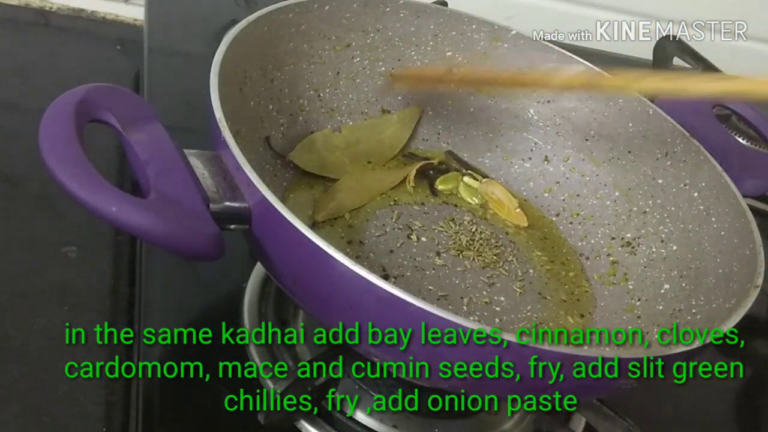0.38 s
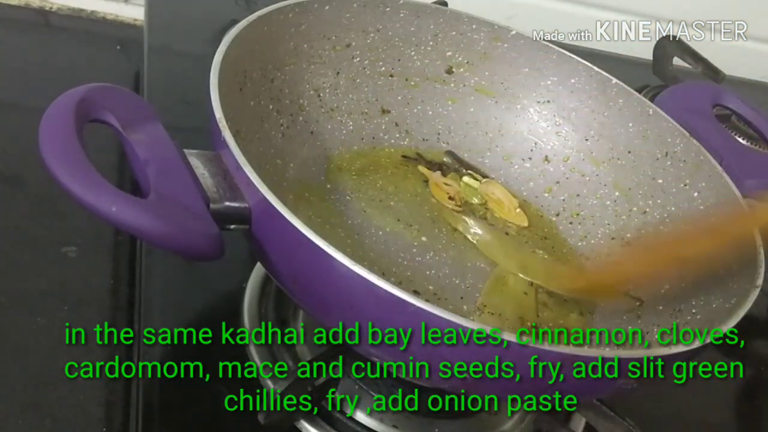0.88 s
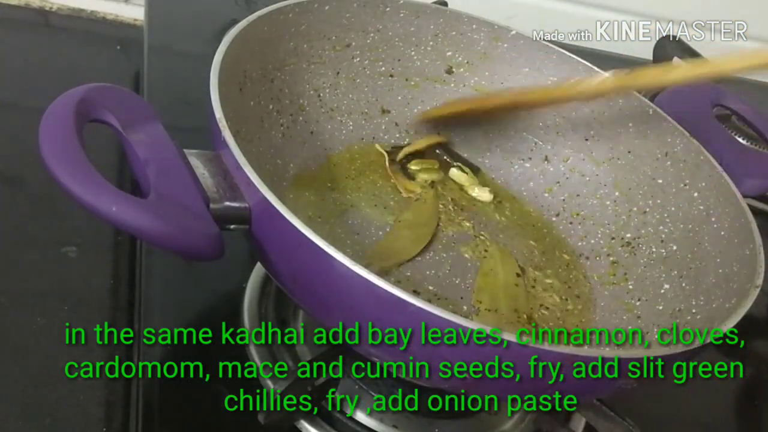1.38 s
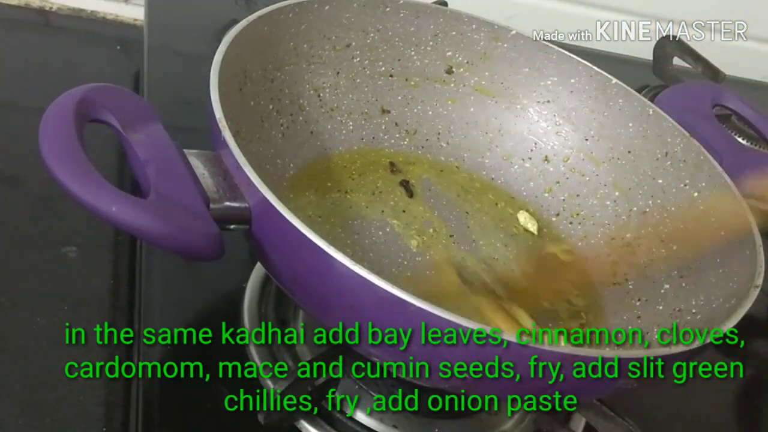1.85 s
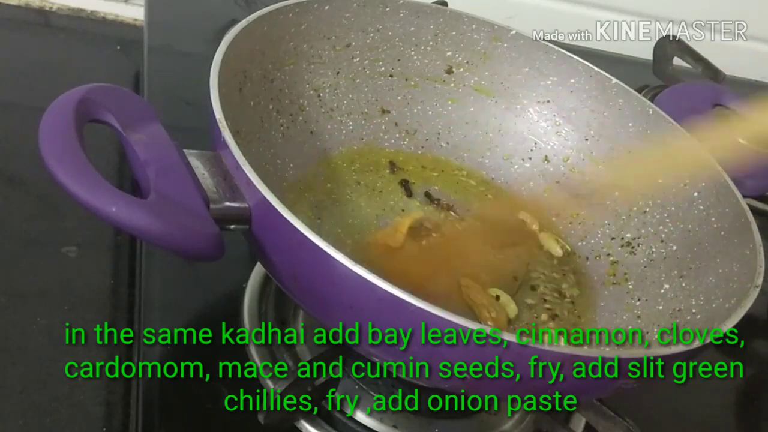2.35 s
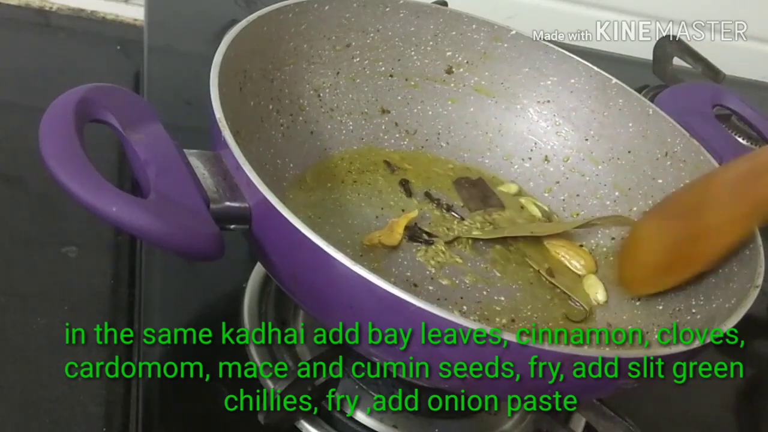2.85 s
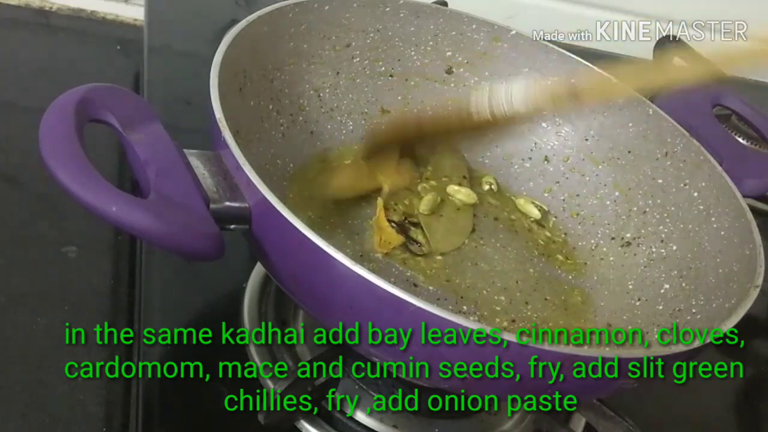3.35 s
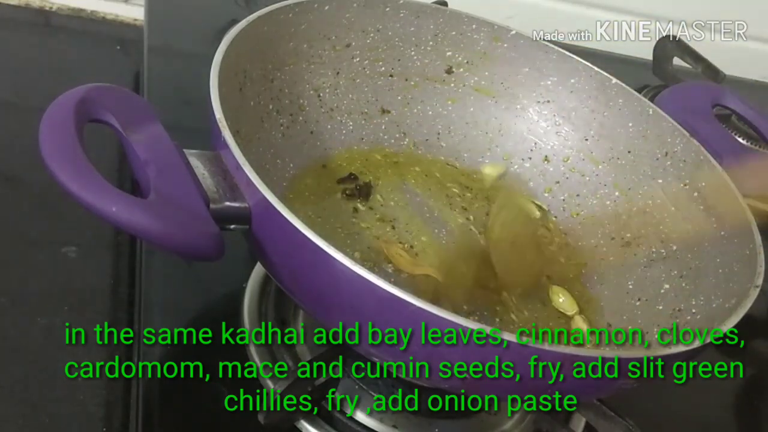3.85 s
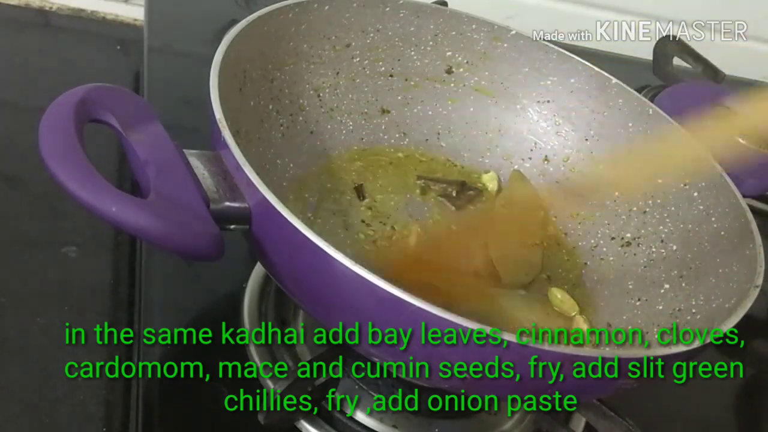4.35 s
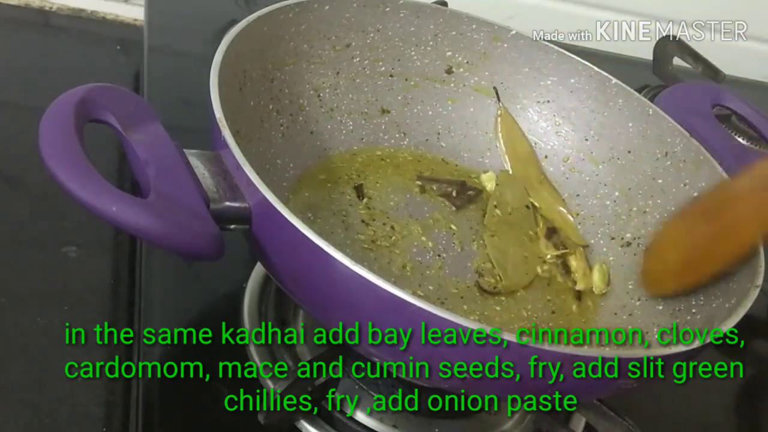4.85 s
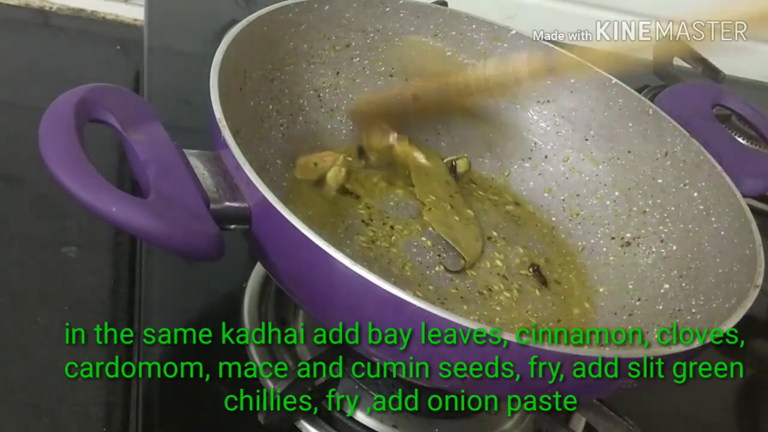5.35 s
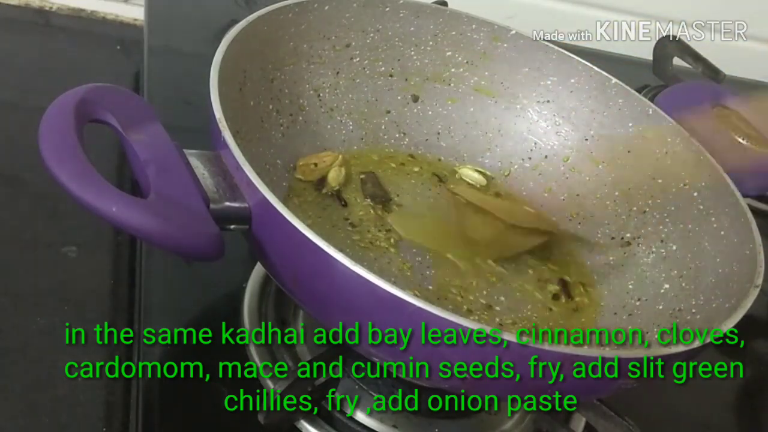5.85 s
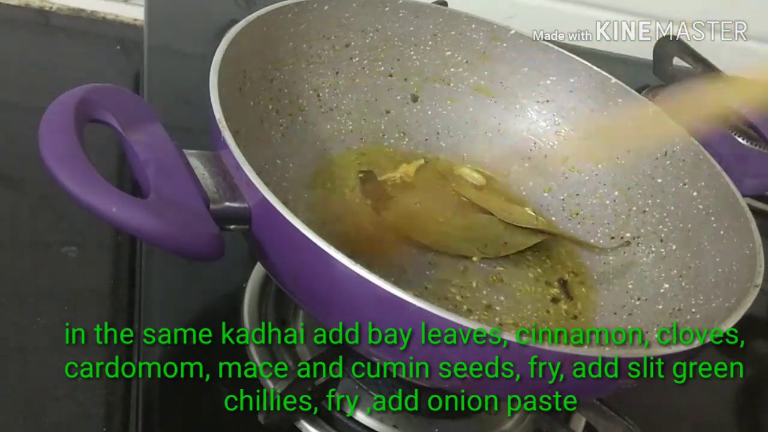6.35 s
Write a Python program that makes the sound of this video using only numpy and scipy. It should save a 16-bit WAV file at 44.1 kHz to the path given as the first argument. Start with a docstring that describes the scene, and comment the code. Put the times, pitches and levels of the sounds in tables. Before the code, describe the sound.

Hot oil fizzes continuously in a pan, thin and quiet at first, then stronger after about a second. Seeds burst with sharp, bright snaps that echo off hard kitchen walls. A wooden spatula scrapes in short repeated strokes, with occasional hollow knocks and small clinks that briefly ring the pan. A faint low room and burner murmur lies beneath. Close stereo phone-like microphone, slightly processed, with crisp treble.

```python
"""Spices frying in a metal pan

In a hard-walled kitchen the oil sizzles as coloured noise bursts; clinks and small bubbles ring as short sines.
Seeds burst with sharp pops, some thumping the pan; a wooden spatula knocks, taps and scrapes its resonances.
Pops and knocks echo off the walls, over a faint low murmur of room and burner.
Two small microphone ports differ in treble; weak bands of the spectrum are emptied, sudden sounds pass."""
import sys
import numpy as np
from scipy import signal
from scipy.fft import rfft, irfft, next_fast_len
from scipy.io import wavfile
from scipy.ndimage import uniform_filter1d, minimum_filter1d, map_coordinates

SR = 44100
rng = np.random.default_rng(int(sys.argv[2]) if len(sys.argv) > 2 else 0)


def transcribe(signal):
    """Save signal, clipped to [-1, 1], as a 16-bit WAV file at the path in sys.argv[1]."""
    frames = np.atleast_2d(signal).T
    limited = np.clip(frames, -1, 1)
    pcm = np.round(limited * 32767).astype(np.int16)
    wavfile.write(sys.argv[1], SR, pcm)


def natural_amplitude(level_db):
    """Convert a level in decibels to a linear amplitude factor, elementwise."""
    exponent = np.asarray(level_db, float) / 20
    return 10 ** exponent


N = 284797  # samples


def unit(x):
    """Scale to rms 1."""
    return x / np.sqrt(np.mean(x ** 2) + 1e-20)


def along(points, hz):
    """Read a curve of (pitch_hz, value) points on a log frequency axis."""
    f, v = np.transpose(points)
    return np.interp(np.log(hz + 1), np.log(f + 1), v)


def wobble(rate):
    """A smooth random curve, rate knots a second."""
    knots = rng.standard_normal(int(N * rate / SR) + 4)
    return map_coordinates(knots, [np.arange(N) * rate / SR])


def filtered(x, response):
    """Filter by a frequency response, scaled so that its impulse has energy 1."""
    m = next_fast_len(N + SR // 2)
    gain = response(np.fft.rfftfreq(m, 1 / SR))
    gain = gain / np.sqrt(np.mean(abs(gain) ** 2))
    return irfft(rfft(x, m) * gain, m)[..., :N]


def colour(spectrum):
    """A smooth response through (pitch_hz, level_db) points."""
    return lambda hz: natural_amplitude(along(spectrum, hz))


def grains(alike, spread_db, rate):
    """Stereo noise of uneven loudness; alike is the share of power common to both ports."""
    shared, own = rng.standard_normal(N), rng.standard_normal((2, N))
    noise = np.sqrt(alike) * shared + np.sqrt(1 - alike) * own
    return unit(natural_amplitude(spread_db * wobble(rate)) * noise)


# Sizzle of the oil over time, before trim and wobble: time_s, level_db
OIL_LEVEL = [(0.0, -42), (0.3, -47.5), (0.43, -38.5), (1.04, -38.5), (1.2, -27), (1.33, -36.5), (1.62, -36),
             (2.53, -34), (2.81, -37), (3.27, -39.5), (3.61, -38), (4.6, -35.5), (4.95, -37), (5.15, -36),
             (5.48, -35), (5.65, -39.5), (6.28, -39), (6.4, -50)]
# Colour of the sizzle, relative: pitch_hz, level_db (per Hz)
FIZZ_COLOUR = [(500, -69), (900, -29), (1500, -24.5), (2500, -17), (3600, -14), (7100, -9), (9000, -4.5),
               (10500, -0.5), (12800, -0.5), (15000, -5), (16000, 2)]


def oil_level_db(time_s):
    """The sizzle table read at any moment, linear in dB."""
    return np.interp(time_s, *np.transpose(OIL_LEVEL))


def sizzle():
    """Countless tiny steam bubbles burst at the surface of the oil; a few larger ones tick out."""
    fizz = grains(alike=0.017, spread_db=-0.5, rate=530)
    strikes = rng.random(N) < 70 / SR  # about 70 a second
    ticks = strikes * natural_amplitude(np.minimum(2.0 * rng.exponential(size=N), 11))
    decay = natural_amplitude(-60 * np.arange(200) / SR / 0.0048)  # t60 4.8 ms
    ticks = signal.fftconvolve(ticks, decay)[:N] * rng.standard_normal((2, N))
    level_db = oil_level_db(np.arange(N) / SR) + 1.5 + 1.1 * wobble(9) + 0.95 * wobble(32)
    return natural_amplitude(level_db) * filtered(fizz + 1.44 * ticks, colour(FIZZ_COLOUR))


# The kitchen at rest, relative: pitch_hz, level_db (per Hz)
MURMUR_COLOUR = [(20, -5), (100, 3), (160, 3), (300, -10.5), (600, -15), (1000, -39)]


def kitchen():
    """A faint low murmur of room and burner: slowly swelling noise, mostly alike at both ports."""
    return natural_amplitude(-80.5) * filtered(grains(alike=0.75, spread_db=10.0, rate=4.2), colour(MURMUR_COLOUR))


# Clinks, small damped rings, before rise and panning: start_s, pitch_hz, level_db
CLINKS = [(2.425, 995, -43), (2.447, 1200, -39), (5.05, 1580, -41), (5.1, 1380, -45), (5.27, 1710, -48),
          (6.212, 1270, -50)]


def clinks_and_bubbles():
    """Small clinks ring briefly at a pitch of their own, among random small bubbles, each from its own side."""
    bubble_count = 600  # scattered by chance
    chance = rng.standard_normal((bubble_count, 2))
    when = rng.random(bubble_count) * N / SR
    bubble_hz = 2610 * 2 ** (0.7 * chance[:, 0])  # spread in octaves
    bubble_db = oil_level_db(when) - 23 + 3.5 * chance[:, 1]
    s, hz, db = np.r_[CLINKS, np.c_[when, bubble_hz, bubble_db]].T[..., None]
    # cycles in which a ring falls by 60 dB: clinks, bubbles
    cycles = np.r_[[39] * len(CLINKS), [13.5] * bubble_count][:, None]
    t = np.arange(1500) / SR
    rise = 1 - np.exp(-t * hz / 1.1)
    rings = natural_amplitude(db - 60 * t * hz / cycles) * np.sin(2 * np.pi * hz * t) * rise
    place = (np.round(s * SR).astype(int) + np.arange(len(t))).ravel()
    pan_db = 1.6 * rng.standard_normal((len(s), 1))
    return np.array([np.bincount(place, (rings * natural_amplitude(side * pan_db)).ravel(), N + SR)[:N]
                     for side in (1, -1)])


# Resonances of the pan, relative: pitch_hz, width_hz, level_db
PAN_RESONANCES = [(153, 20, -5), (226.1, 12.5, -1), (289, 36, -8.5), (461, 49, -10), (569.5, 32, -1.5),
                  (674.5, 37, -1.5), (783, 73, -5), (917.5, 77, -7.5), (1170, 120, -8.5), (1694, 110, -4),
                  (1917, 140, -8), (2300, 87, -3), (2486, 98, -7)]


def pan_modes(lo_hz, hi_hz):
    """The pan's resonances between two frequencies; nothing radiates far below them."""
    def response(f):
        modes = sum((-1) ** k * natural_amplitude(db) * 1j * f * w / (c * c - f * f + 1j * f * w)
                    for k, (c, w, db) in enumerate(PAN_RESONANCES) if lo_hz < c < hi_hz)
        return (1j * f / (1j * f + lo_hz)) ** 2 * modes
    return response


def spells(rows, rise_s, fall_db_per_s, resting_db):
    """Each row swells, holds and dies away: a gain curve per level column, above its resting level."""
    start, length, *levels_db = np.transpose(rows)[..., None]
    t = np.arange(0, N + 64, 64) / SR
    rise = np.clip((t - start) / rise_s + .5, 0, 1)  # half way up at the start time
    shape = rise * natural_amplitude(-fall_db_per_s * np.clip(t - start - length, 0, None))
    gains = []
    for db, rest_db in zip(levels_db, resting_db):
        power = ((natural_amplitude(db) * shape) ** 2).sum(axis=0) + natural_amplitude(rest_db) ** 2
        gains.append(np.interp(np.arange(N) / SR, t, np.sqrt(power)))
    return gains


# Spatula strokes: start_s, length_s, rasp_db, wall_ring_db, drag_db
SPATULA_STROKES = [(0, 0.018, -56.5, -63.5, -69), (.31, 0.21, -62, -69.5, -69), (.58, 0.21, -48, -77, -71),
                   (.76, 0.08, -48, -60, -98), (1.08, 0.17, -44.5, -70, -61), (1.47, 0.13, -44, -61.5, -65),
                   (1.68, 0.23, -49, -61.5, -64.5), (2.03, 0.15, -69, -65, -58),
                   (2.33, 0.21, -44.5, -67, -73), (2.56, 0.092, -45.5, -69, -97),
                   (2.9, 0.27, -47.5, -73, -64), (3.27, 0.17, -46, -68, -68), (3.45, 0.11, -44, -56, -63),
                   (3.64, 0.12, -52.5, -64.5, -90), (3.8, 0.09, -45.5, -55, -70),
                   (3.87, 0.13, -48.5, -56, -96), (4.22, 0.2, -47.5, -70, -74),
                   (4.44, 0.13, -46.5, -59.5, -100), (4.68, 0.27, -59, -88, -78),
                   (4.92, 0.17, -46.5, -56, -81), (5.04, .12, -47.5, -60.5, -66),
                   (5.38, 0.21, -48, -66.5, -76.5), (5.85, 0.059, -48, -57.5, -86),
                   (6.27, 0.19, -48.5, -70, -63)]
# The pan shudders on its stand: start_s, length_s, bottom_rumble_db, rim_hum_db
PAN_SHAKES = [(0, 0.043, -74, -62), (.77, 0.18, -73, -71.5), (1.02, 0.097, -69, -53),
              (1.21, 0.063, -68, -62), (1.29, 0.029, -62, -59), (1.45, 0.058, -62, -57),
              (2.15, 0.21, -83, -70), (2.62, 0.15, -84, -71.5), (2.86, 0.087, -60, -64),
              (3.08, 0.12, -89, -69), (3.22, 0.18, -60, -64), (3.45, 0.09, -67, -70),
              (3.55, 0.035, -69, -54), (3.62, 0.22, -66, -62), (3.82, 0.17, -60, -66),
              (4.49, .025, -84, -73), (4.62, 0.02, -71, -67), (4.73, 0.025, -69, -81),
              (4.93, 0.077, -57.5, -62), (5.04, 0.039, -60, -56), (5.12, .015, -65, -59),
              (5.16, 0.049, -76, -62), (5.87, 0.096, -66, -85), (6.37, 0.079, -70, -69)]
# The pan never quite still: level_db by layer name (rasp, ring, drag, rumble, hum)
RESTING_LEVELS = {"rasp": -70.5, "ring": -79.5, "drag": -100, "rumble": -94, "hum": -88}
# Wood on the coating, relative: pitch_hz, level_db
RASP_COLOUR = [(500, -59), (780, -14.5), (1200, -5), (2500, -2.5), (5000, -0.5), (8000, -3.5), (12000, -12)]


def scraping():
    """Slips of the spatula on the rough coating rasp and ring the wall; the pan shudders on its stand."""
    rasp, ring, drag = spells(SPATULA_STROKES, rise_s=0.13, fall_db_per_s=115.5,
                              resting_db=[RESTING_LEVELS[k] for k in ("rasp", "ring", "drag")])
    rumble, hum = spells(PAN_SHAKES, rise_s=0.019, fall_db_per_s=404,
                         resting_db=[RESTING_LEVELS[k] for k in ("rumble", "hum")])

    def slips(alike, spread_db, rate, response):
        return filtered(grains(alike, spread_db, rate), response)

    rasp = rasp * natural_amplitude(1.26 * wobble(24))
    return (rasp * slips(alike=0.35, spread_db=1.5, rate=300, response=colour(RASP_COLOUR))
            + ring * slips(alike=0.43, spread_db=3.0, rate=38, response=lambda hz: pan_modes(830, 1000)(hz) ** 2)
            + rumble * slips(alike=1.0, spread_db=6.0, rate=20, response=pan_modes(65, 260))
            + hum * slips(alike=0.76, spread_db=2.5, rate=39, response=pan_modes(220, 360))
            + drag * slips(alike=0.26, spread_db=4.0, rate=22, response=pan_modes(380, 830)))


def echoing(times, levels_db, rooms_db, pans_db, spread_s, room_t60, dense_s, alike, near_db):
    """Short bursts, each followed by strong near echoes that thicken into a dying tail."""
    out, t = np.zeros((2, N + SR)), np.arange(int(.55 * SR)) / SR

    def mix(three):
        """One shared signal and one for each port."""
        return alike * three[0] + (1 - alike) * three[1:]

    density = np.clip((t / dense_s) ** 2, .07, 1)  # echoes per sample grow with the square of delay
    tail = (t > .002) * natural_amplitude(-60 * t / room_t60)
    near = (t > .002) * natural_amplitude(near_db - 60 * t / 0.017)
    for s, db, room_db, pan_db in zip(times, levels_db, rooms_db, pans_db):
        # each band of the burst arrives at its own moment
        late = spread_s * mix(np.repeat(rng.random(size=(3, 16)), 16, axis=1))
        burst = irfft(np.exp(-2j * np.pi * np.cumsum(late, axis=1) * SR / 510))
        present = rng.random((3, len(t))) < density
        walls = mix(rng.standard_normal((3, len(t))) * present / np.sqrt(density))
        walls *= natural_amplitude(room_db - 15.5) * tail + near
        walls[:, 0] = natural_amplitude([pan_db / 2, -pan_db / 2])  # the direct sound
        sound = signal.fftconvolve(walls, burst, axes=1)[:, :len(t)]
        out[:, round(s * SR):][:, :len(t)] += natural_amplitude(db) * sound
    return out[:, :N]


# Pops, relative levels before the trims below: start_s, snap_db, body_over_snap_db, room_db,
# left_over_right_db (direct sound), deep_over_body_db
SEED_POPS = [(0.2586, -9.5, -24.5, -1.5, -0.5, -10), (0.4536, -18.5, -11, -13, 0.5, -13),
             (0.491, -31, -15, -23, 8, -6), (0.594, -33, -22, -7, 22, -7), (0.9815, -25, -20, -10, 8, -14),
             (1.114, -6.5, -28.5, -12.5, -5, -9), (1.1841, -9, -20, -8.5, -2, -8),
             (1.315, -21.5, -1, -14.5, -3, -25), (1.966, -25, -17, -15, 7, -7),
             (1.9838, -7.5, -14, -9.5, 1.5, 2.5), (2.2816, -24.5, -12, -9.5, 2, -5),
             (2.482, -29, -21, -16, 2, -3), (2.54, -30, -31, -18, 10.5, -6),
             (2.5668, -27.5, -17, -11, 6, 2), (2.601, -32, -21.5, 1.5, 0, 3),
             (2.7306, -41, -28, -12, -2, -6), (2.8004, -30, -23, -3, 4, -1),
             (2.838, -28.5, -23.5, -5, 11, 5), (2.869, -29.5, -35, -12, 17, -5),
             (2.9186, -29, -30, -18, 2, -6), (2.96, -16, -23.5, -14, 1, -6),
             (2.9957, -6.5, -24.5, -10, -1.5, -7), (3.1976, -15.5, -18, -7, -2, -2),
             (3.548, -31.5, -37, 0.5, 3, -7), (3.7453, -28.5, -14, -8.5, -8, -3),
             (3.7753, -17, -49, -17, -6, -6), (3.8, -23, -23.5, -4, 6.5, -2),
             (4.0045, -27, -49, -12, 8, -6), (4.1751, -13, -23.5, -11, 1, -7),
             (4.309, -19, -44, -8, 14, -8), (4.374, -19.5, -25, -19, 10.5, -8),
             (4.4542, -32, -25, -14, 6, -6), (4.613, -29, -14.5, -11, 0, 2), (4.708, -36, -27, -9, 4, -6),
             (4.954, -27, -18.5, -9, 6, -9), (5.1073, -23.5, -22, -15, -3, -10),
             (5.2098, -40, -28, -17, 4, -4), (5.2898, -23.5, -28, -21, 4, -6),
             (5.3232, -32, -22, -23, 4, -4), (5.4179, -28, -18.5, -11.5, 4, 3),
             (5.4649, -31.5, -15, -9, -5, -3), (5.6262, -30.5, -28, -13, 2, -8),
             (5.6732, -31, -20, -11, 2, -8), (5.809, -33, -19, -0.5, -4, -6),
             (5.8487, -27.5, -18.5, -7, 0, 0.5), (6.289, -20.5, -37, -10, 2, -8),
             (6.323, -9, -25, -6.5, 2.5, -5), (6.4174, -15.5, -12, -11.5, -1, 3)]
# Sharp, fuller and deepest part of a pop, relative: pitch_hz, level_db
SNAP_COLOUR = [(150, -35.5), (900, -25.5), (3000, -26.5), (7000, -18), (9000, -6), (11500, 1),
               (14000, -2.5), (15800, -10)]
BODY_COLOUR = [(200, -58), (1000, -9.5), (2500, -7.5), (5000, 3), (8000, 7.5), (11000, -20)]
DEEP_COLOUR = [(300, -37), (1200, -31), (2200, -10), (3200, -3), (4800, -1), (7000, -7), (10000, -39)]


def pops():
    """A seed or drop of water bursts: a sharp snap, a fuller and a deeper crack. Faint ones come at random."""
    faint_count = 5
    when = N / SR * rng.random(faint_count)
    size, side = rng.standard_normal((2, faint_count))
    faint_db = oil_level_db(when) + 5 + 1.5 * size
    same = np.ones(faint_count)
    faint = np.c_[when, faint_db, -24.5 * same, -6.5 * same, -4 * (1 + side), -5 * same]
    s, db, body_db, room_db, pan_db, deep_db = np.r_[SEED_POPS, faint].T
    s = s + .0006  # the burst begins this long after the listed time
    snap = echoing(s, db + 12.5, room_db, pan_db + 2.0, spread_s=0.0025, room_t60=0.45,
                   dense_s=0.037, alike=0.19, near_db=-18.5)
    body = echoing(s, db + body_db + 22.0, room_db, pan_db, spread_s=0.001161, room_t60=0.62,
                   dense_s=0.037, alike=0.36, near_db=-17.5)
    deep = echoing(s, db + body_db + deep_db + 19.5, room_db, pan_db, spread_s=0.001236, room_t60=0.5,
                   dense_s=0.045, alike=0.42, near_db=-19.5)
    return (filtered(snap, colour(SNAP_COLOUR)) + filtered(body, colour(BODY_COLOUR))
            + filtered(deep, colour(DEEP_COLOUR)))


# Knocks and pop thumps, relative levels before the trims below: start_s, wall_db,
# click_over_wall_db, thud_over_wall_db, ring_on_db, lower_over_wall_db
PAN_KNOCKS = [(0.981, -25.5, -13.5, -29, -3, -18.5), (1.109, -44, -1.5, -4, -13, -3),
              (1.181, -45.5, 5, -1, -18, 3), (1.407, -35, -33, -15, -7, -4.5),
              (2.213, -47, -11, -8, -3.5, 1), (3.195, -29.5, -4.5, -17, -9.5, -7.5),
              (3.793, -46.5, -7, -8, -2.5, -7.5), (4.195, -48.5, -1, -5.5, -11, 2),
              (4.891, -33.5, -8, -23.5, -5.5, -7.5), (5.85, -42.5, -11, -22, -2, -8),
              (6.18, -50, -15, -6, -0.5, 2), (6.319, -52.5, 0, 0, -27, -9)]
# Click of a knock, relative: pitch_hz, level_db
CLICK_COLOUR = [(150, -26), (500, -17.5), (1200, -6), (1600, -7), (2000, -4.5), (2500, -6), (3200, -3),
                (5000, -16.5), (12000, -45)]


def knocks():
    """The spatula lands, or a strong pop thumps the pan: a click, the ringing wall, a thud of the bottom."""
    s, db, click_db, thud_db, ring_db, lower_db = np.transpose(PAN_KNOCKS)
    s = s + 0.0042  # the blow falls this long after the listed time

    def blow(level_db, tail_db, t60, alike, lag_s=0):
        return echoing(s + lag_s, level_db, tail_db, 0 * s, spread_s=0.001593, room_t60=t60,
                       dense_s=.02, alike=alike, near_db=-27)

    def edge(hz):
        """The click sounds through the upper modes; a share of 0.22 passes between them."""
        return colour(CLICK_COLOUR)(hz) * (0.22 + pan_modes(1000, 3000)(hz))

    click = blow(db + click_db + 24.5, ring_db - 4.5, t60=0.52, alike=0.52)
    wall = blow(db + 9.0, ring_db, t60=0.52, alike=0.67)
    lower = blow(db + lower_db + 13.0, ring_db, t60=0.62, alike=0.84)
    # the stand answers after the wall
    bottom = blow(db + thud_db + 27.0, ring_db, t60=0.35, alike=0.76, lag_s=.006)
    return (filtered(click, edge) + filtered(wall, pan_modes(460, 1000))
            + filtered(lower, pan_modes(320, 520)) + filtered(bottom, pan_modes(116, 360)))


# The spatula's wood sounds, levels before a 2 dB lift: start_s, first_db, first_hz, second_db,
# second_hz, t60_s (at 1 kHz)
WOOD_TAPS = [(0.9845, -30, 700, -28, 1960, 0.024), (1.4105, -40, 780, -40, 327, .03),
             (2.216, -55, 590, -42, 240, 0.033), (3.1983, -14.5, 1200, -19.5, 2480, 0.0043),
             (3.796, -46, 700, -52, 300, 0.019), (4.8948, -42, 670, -38, 2320, 0.03),
             (4.899, -46, 1150, -43, 1930, 0.039), (5.852, -44.5, 935, -48, 700, 0.046),
             (6.185, -47, 494, -44, 254, .025)]


def taps():
    """Hard contact makes the wood ring at two notes that depend on where it strikes; higher ones die sooner."""
    out = np.zeros((2, N + SR))
    lag_s = np.array([[0], [.00006]])  # right port after left
    t = np.clip(np.arange(4000) / SR - lag_s, 0, None)

    def note(db, hz, t60):
        decay = natural_amplitude(db - 60 * t / t60 * (hz / 1000) ** 0.13)
        rise = 1 - np.exp(-t * hz / 0.29)  # time constant 0.29 cycles
        return decay * np.sin(2 * np.pi * hz * t) * rise

    for s, db, hz, second_db, second_hz, t60 in WOOD_TAPS:
        both = note(db, hz, t60) + note(second_db, second_hz, t60)
        out[:, round(s * SR):][:, :len(t[0])] += natural_amplitude(2) * both
    return out[:, :N]


def scene():
    """Oil, seeds, spatula and room together."""
    return sizzle() + kitchen() + clinks_and_bubbles() + scraping() + pops() + knocks() + taps()


# Spectral thinning: pitch_hz, taken (share of the neighbourhood power taken out),
# shut (share of the neighbourhood power under which a band is shut)
SPECTRAL_THINNING = [(1030, .001, 0.00062), (1620, 0.22, 0.35), (2880, 1.09, .72), (4600, 1.56, .75),
                     (7800, 1.15, 0.83), (10100, 0.62, 0.8), (11840, .02, 0.22)]


def thinned(x):
    """Spectral thinning: what is weak among its spectral neighbours is emptied; sudden sounds pass."""
    hz, t, z = signal.stft(x, SR, window="cosine", nperseg=2048)
    power, table = abs(z) ** 2, np.array(SPECTRAL_THINNING)
    taken = along(table[:, [0, 1]], hz)[:, None]
    shut = along(table[:, [0, 2]], hz)[:, None]
    near, wide = uniform_filter1d(power, size=5, axis=1), uniform_filter1d(power, size=61, axis=1)
    gain = np.sqrt(np.clip(1 - taken * wide / (0.52 * power + 0.5 * near + 1e-20), .003, 1))
    # weak bands close in both channels
    band = uniform_filter1d(uniform_filter1d(power.sum(axis=0), size=7, axis=0), size=3, axis=1)
    around = uniform_filter1d(wide.sum(axis=0), size=3, axis=1)
    weak = uniform_filter1d(1. * (band < shut * around), size=5, axis=0) > 0
    gain *= np.where(weak, .03, 1)
    # lost loudness is made up, within a limit
    makeup = np.sqrt(wide / (uniform_filter1d(power * gain ** 2, size=61, axis=1) + 1e-20))
    gain *= makeup.clip(1, 2.5)
    # where short-term power peaks far above its average, everything passes
    middle = filtered(x, lambda f: (f > 1200) * (f < 9000))
    quick = uniform_filter1d((middle ** 2).sum(axis=0), size=96)
    peak = -minimum_filter1d(-quick, size=1500)
    crest = peak / (abs(uniform_filter1d(quick, size=2048)) + 1e-20)
    gain[..., crest[np.minimum((t * SR).astype(int), N - 1)] > 3.5] = 1
    return signal.istft(z * gain, SR, window="cosine", nperseg=2048)[1][:, :N]


# Treble balance of the two microphone ports: pitch_hz, left_over_right_db
PORT_BALANCE = [(130, 3.5), (500, 3.5), (1000, 1), (4000, 0.5), (8000, -1.5), (12000, 7)]


def top_cut(x):
    """Nothing passes above the cut-off."""
    return signal.sosfilt(signal.butter(12, 16650, fs=SR, output="sos"), x)


def record(dry):
    """Two ports differ in treble and stop at a band limit; peaks round off, deep bass drops, weak bands empty."""
    def ports(hz):
        sides = np.array([[1], [-1]])
        return natural_amplitude(along(PORT_BALANCE, hz) / 2 * sides) * (hz < 15620)

    heard = filtered(dry, ports)
    heard = heard / (1 + abs(heard / .85) ** 6) ** (1 / 6)
    heard = filtered(heard, lambda hz: (1j * hz / (1j * hz + 110)) ** 2)
    finished = thinned(heard)
    return top_cut(finished)


dry = scene()
out = record(dry)
transcribe(out)
```